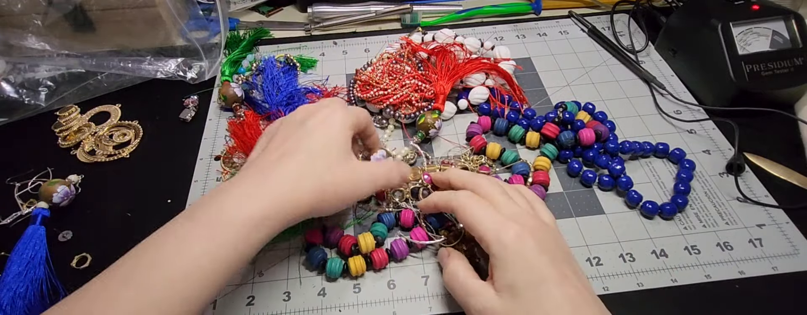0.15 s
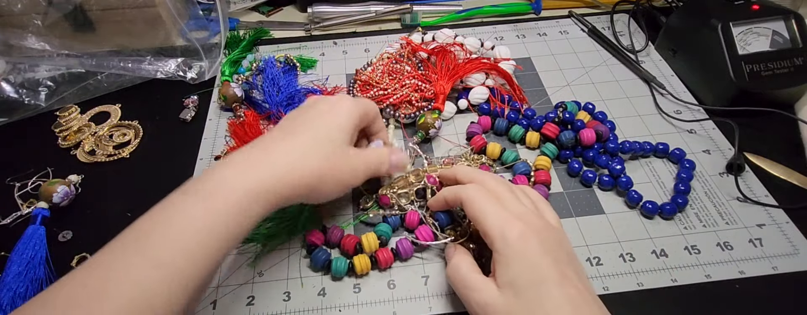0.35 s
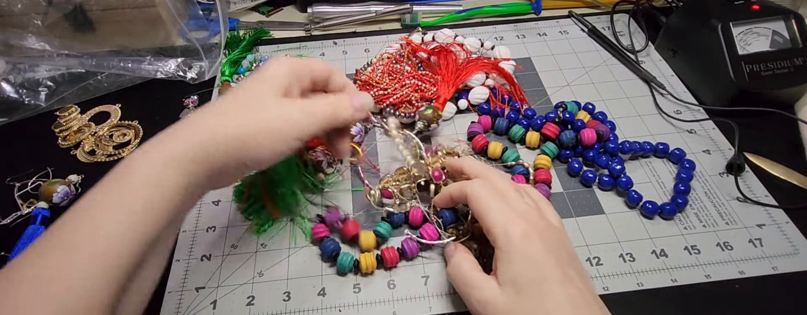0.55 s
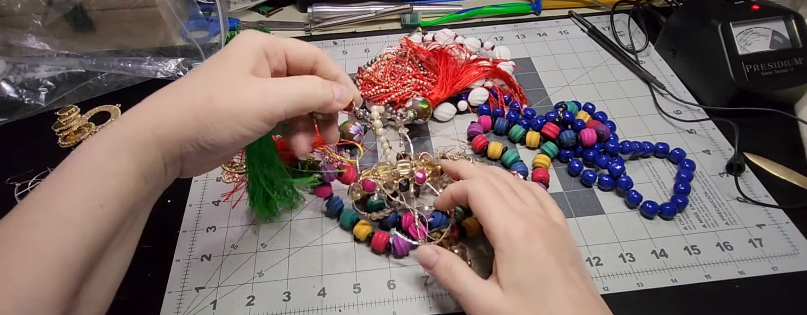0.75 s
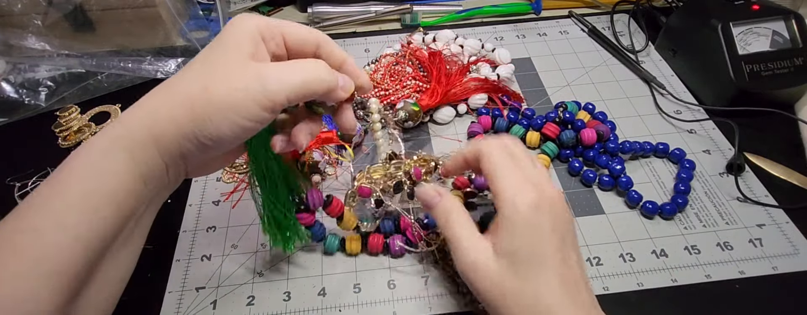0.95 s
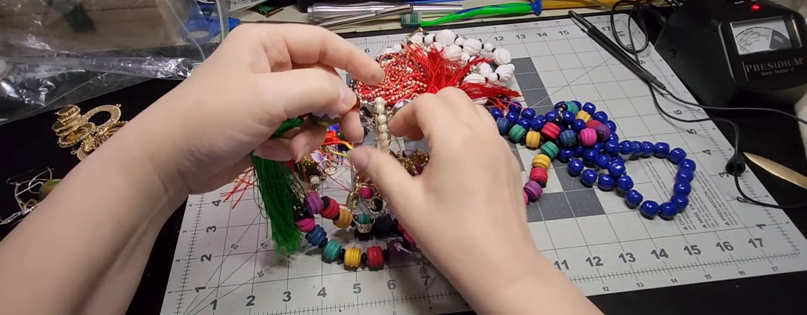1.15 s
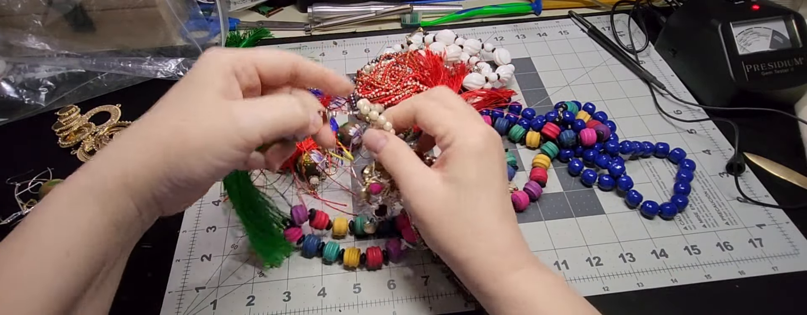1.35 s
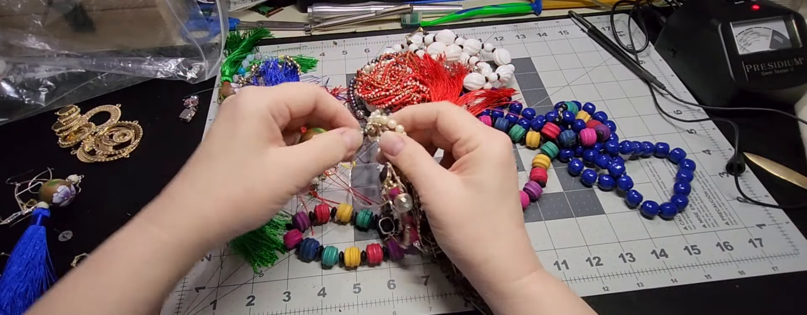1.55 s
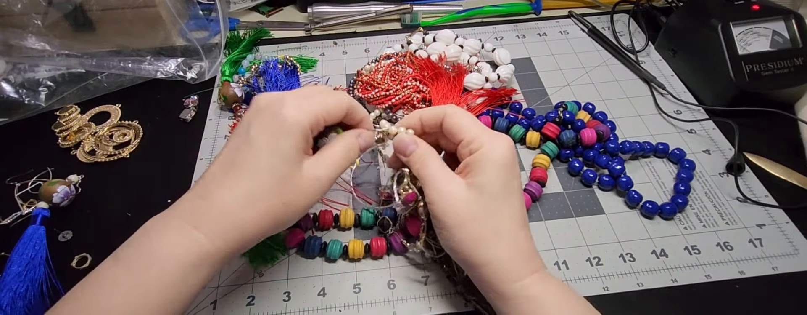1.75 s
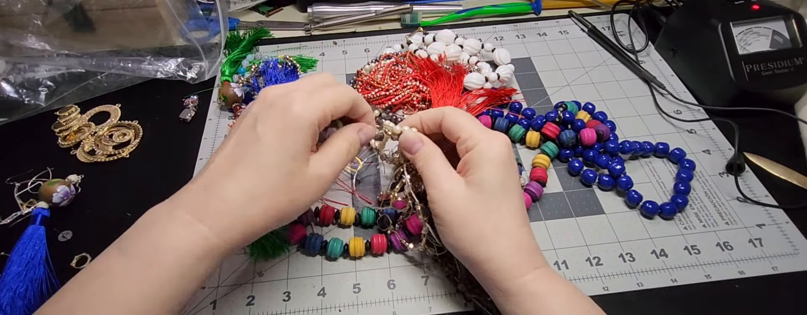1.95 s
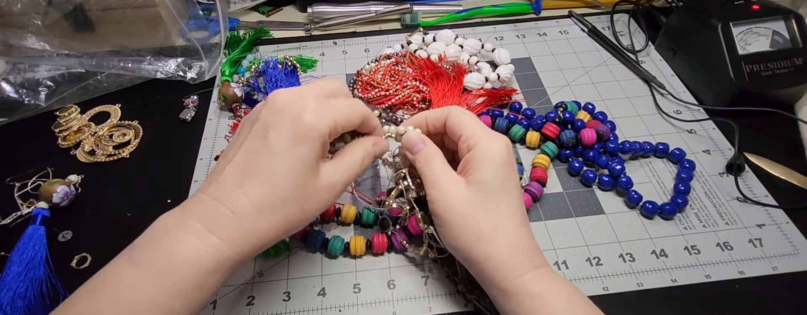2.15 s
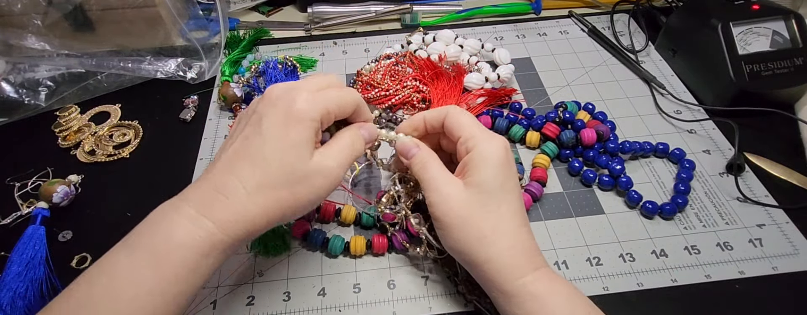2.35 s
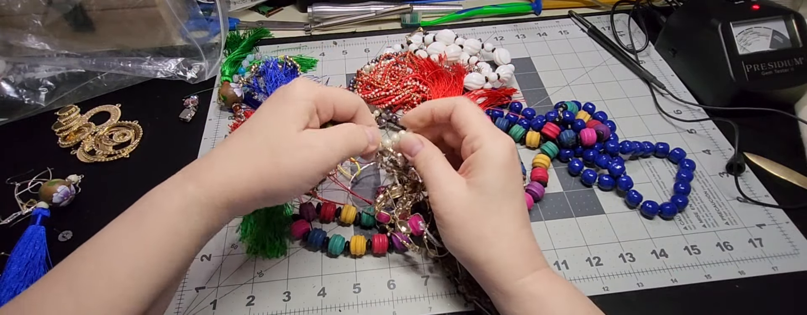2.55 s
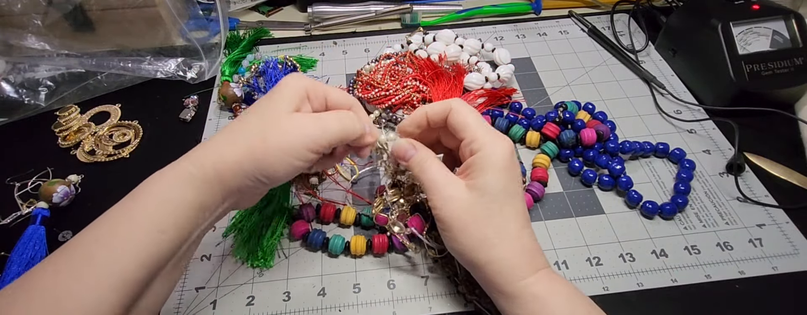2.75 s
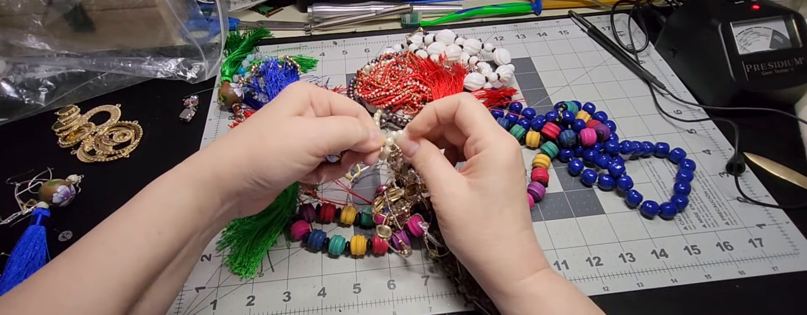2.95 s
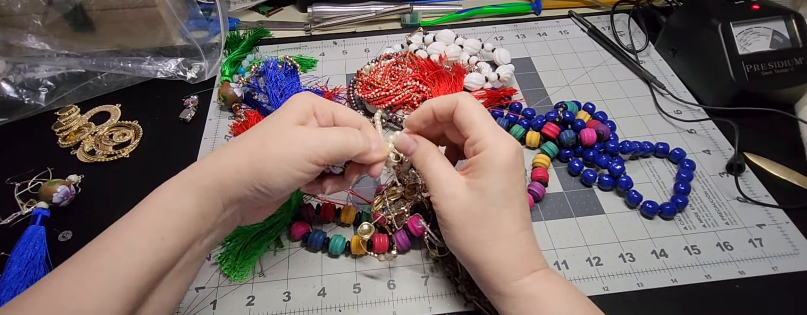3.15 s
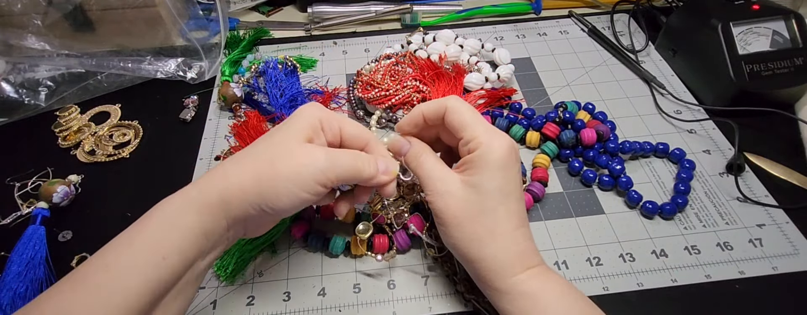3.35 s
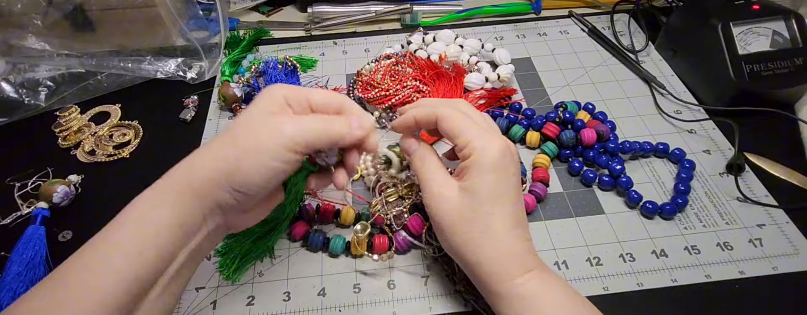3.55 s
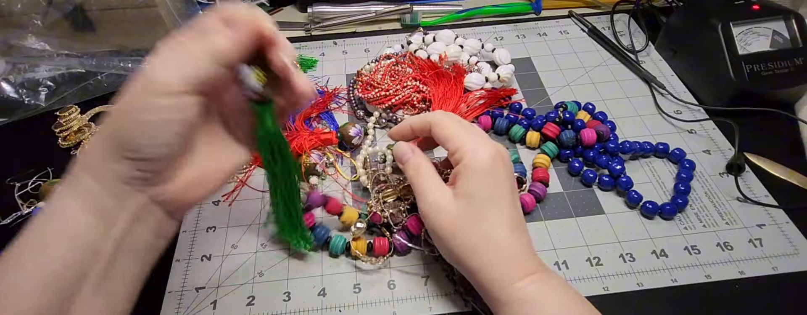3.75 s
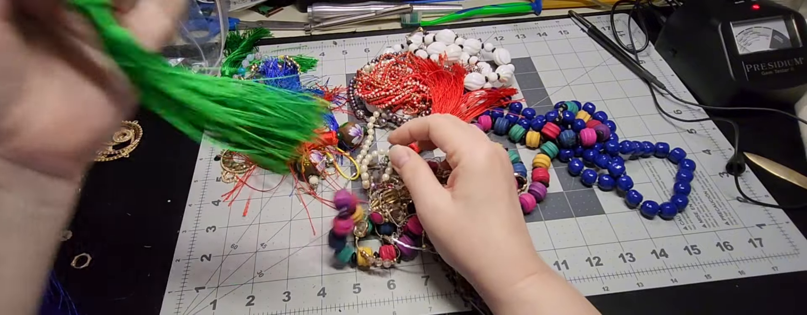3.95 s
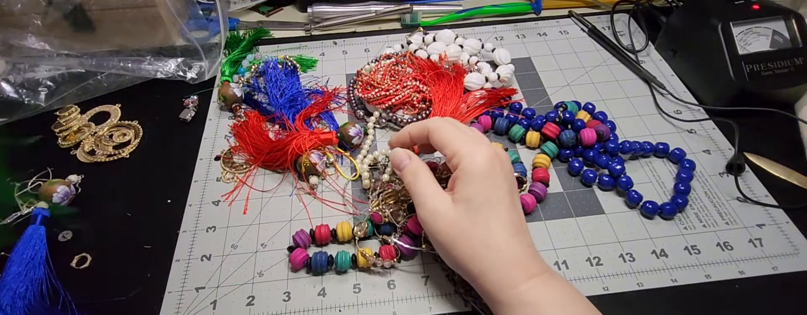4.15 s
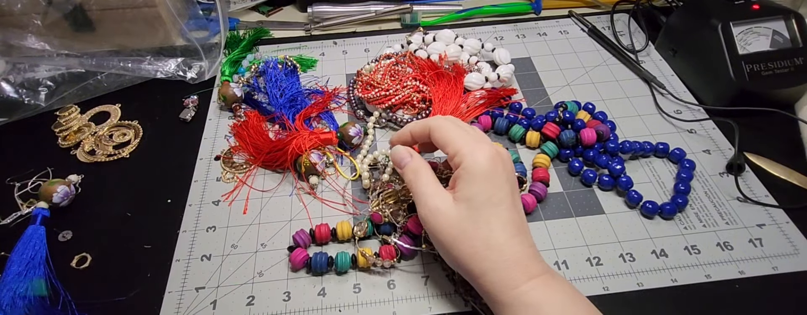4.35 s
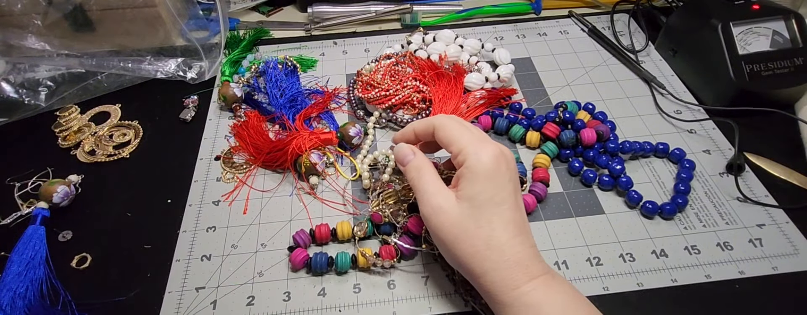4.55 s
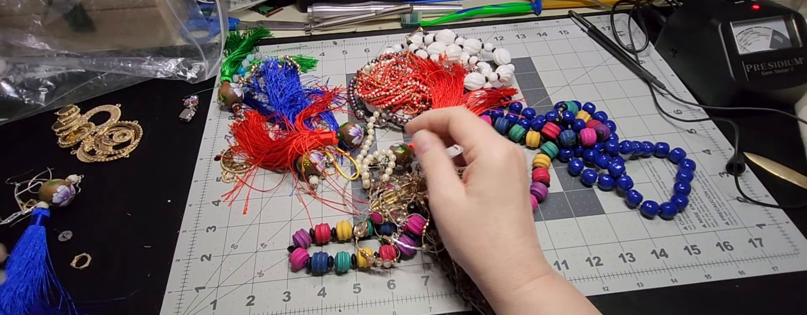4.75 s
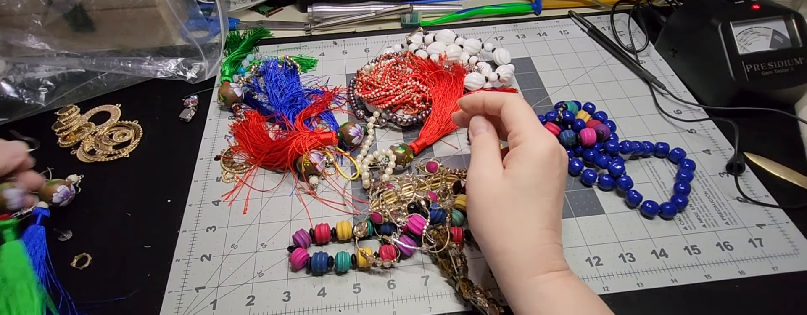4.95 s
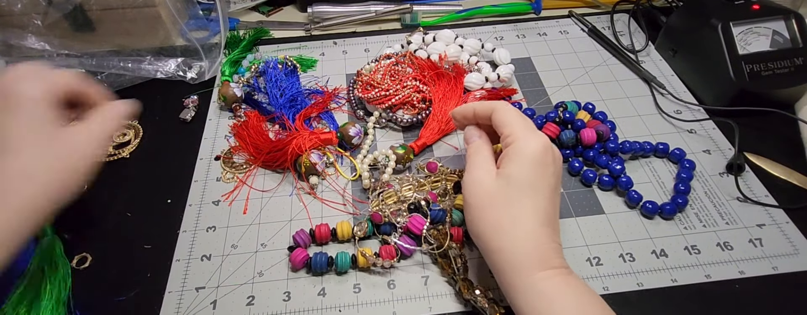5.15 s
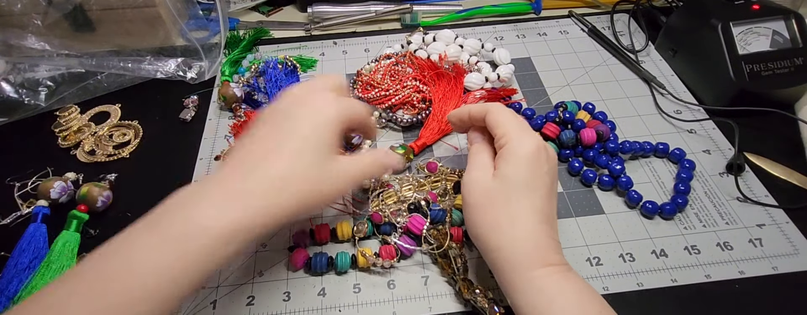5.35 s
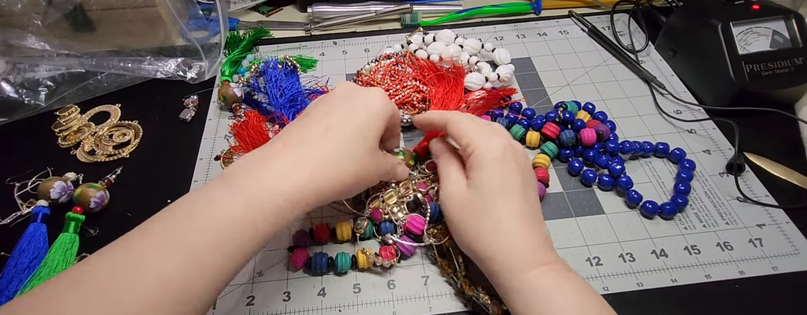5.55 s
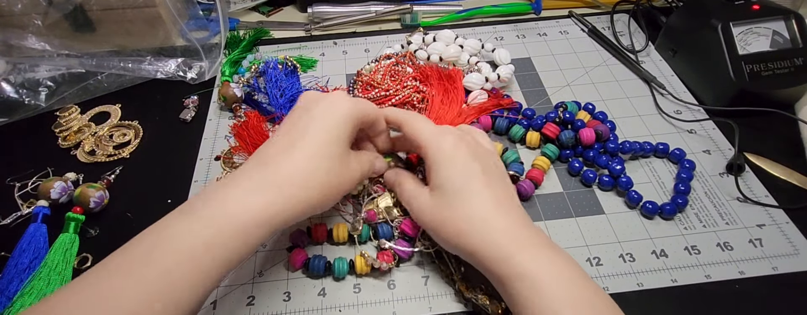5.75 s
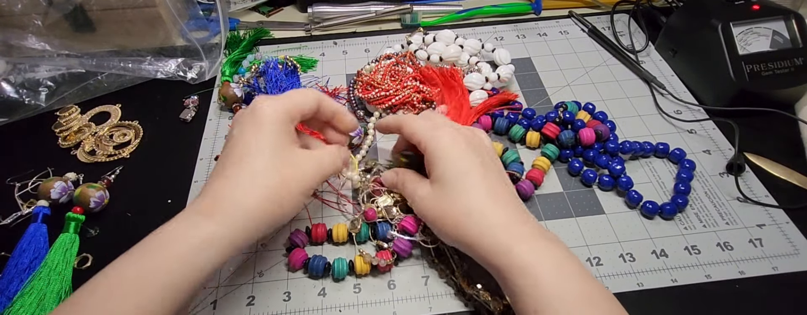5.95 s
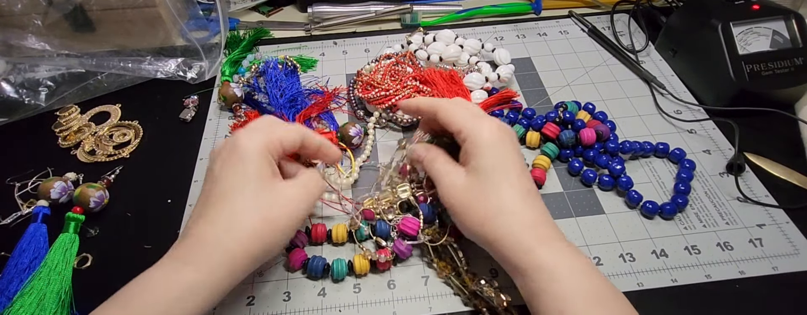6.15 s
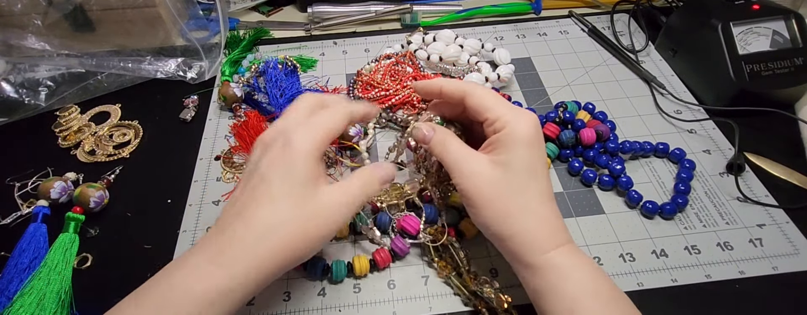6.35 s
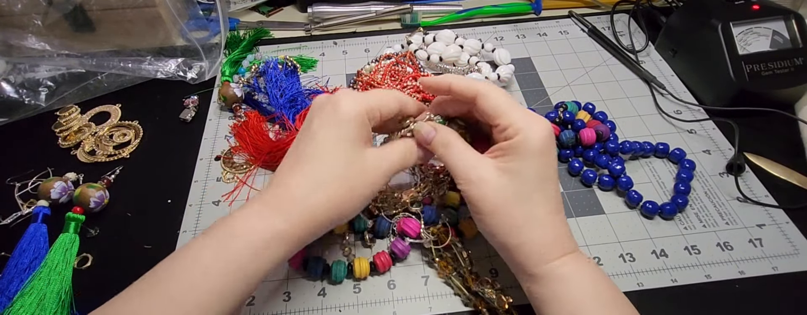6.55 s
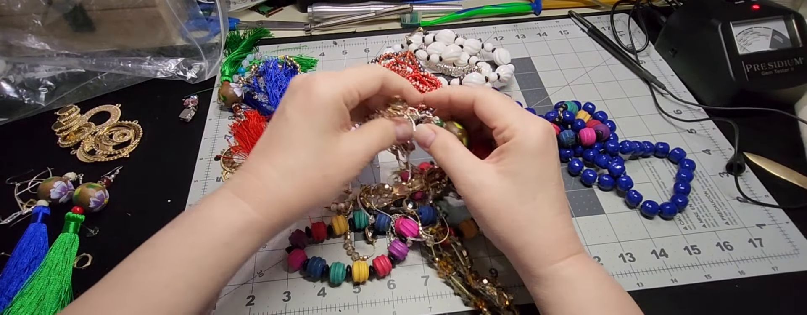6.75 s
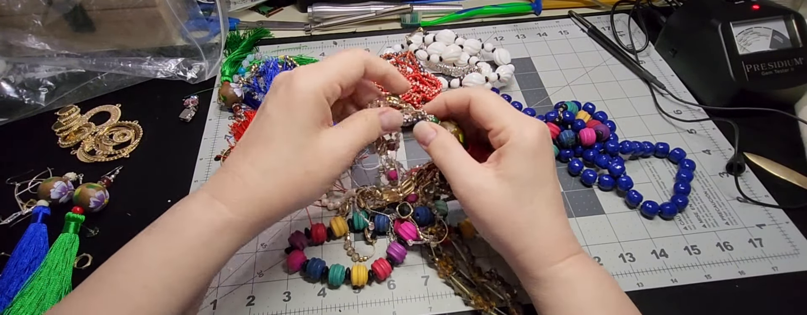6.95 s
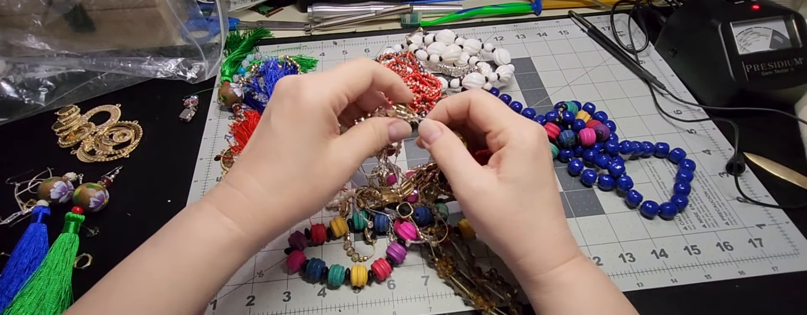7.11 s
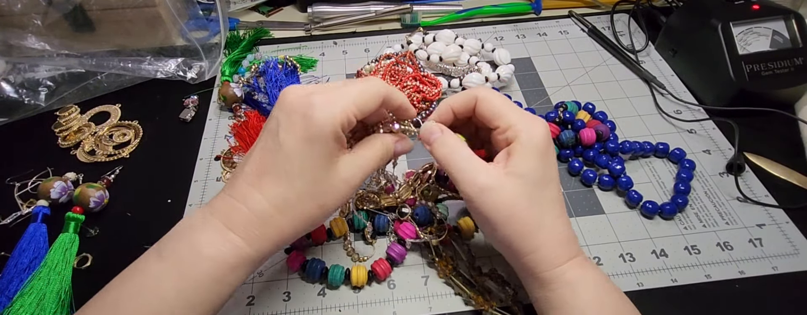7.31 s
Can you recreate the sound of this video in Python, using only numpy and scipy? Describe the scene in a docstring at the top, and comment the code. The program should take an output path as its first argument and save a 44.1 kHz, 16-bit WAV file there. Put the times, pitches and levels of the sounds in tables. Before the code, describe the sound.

Hands sort tangled bead necklaces and fine chains on a mat-covered table, heard close in stereo, mostly slightly left, in a small dry room with faint low rumble, hiss and hum. Light rustles and a soft low thump start the first half second; from 0.5 to 0.9 beads rattle densely with crisp clacks and knocks. Looser clicks follow, clustering around 1.4 to 1.5, then thinning after 2 into tiny ticks and very faint metallic tinks. About 3.45 a brief faint squeak glides upward amid a small rustle. Knocks at 3.9 lead to the loudest, sharp bead clack at 4.1. Near quiet lasts until a clack and dull thumps at 5.1 and 5.3. From 5.5 rustling bursts resume, with a bright click at 6.3 and more rattling to 6.9, then sparse soft ticks to the end near 7.5.

```python
"""A dense rustle of bead strands over rumble and hiss, then clear taps: hands rummage through necklaces
and chains on a mat-covered table, close to two microphones. Rustle and fizz are random tiny contacts;
timed blows ring decaying modes of beads, table and pendants; one sliding tone squeaks.
Noise bursts serve as echoes of table and room; filtered noise and a hum lie below."""
import sys
import numpy as np
from scipy import signal
from scipy.io import wavfile
from scipy.ndimage import uniform_filter1d, map_coordinates

SR = 44100
rng = np.random.default_rng(int(sys.argv[2]) if len(sys.argv) > 2 else 0)


def store_wav(level_fs):
    """Save 16-bit WAV to argv[1]."""
    pcm = np.round(np.clip(np.atleast_2d(level_fs), -1, 1) * 32767)
    wavfile.write(sys.argv[1], SR, pcm.T.astype(np.int16))


N = 329868

# ringing modes of a bead: mode_hz, level_db, t60_s
BEAD_MODES = [(1836, -5.5, 0.0012), (2992, -11, 0.005), (3539, -4, 0.0031), (4537, 0.5, 0.0018),
              (5860, 1.5, 0.0013), (7190, -1, 0.002), (12000, -19, 0.0012)]
# ringing modes of the table top: mode_hz, level_db, t60_s
TABLE_MODES = [(346, -10, 0.0097), (533, -12.5, 0.017), (686.4, -0.5, 0.0034), (1028.4, -5.5, 0.0063),
               (1242, -16, 0.014)]


def from_db(db):
    """Decibels to gain."""
    return 10 ** (np.asarray(db) / 20)


def rms_one(x):
    """Scale to unit rms."""
    return x / np.sqrt(np.mean(x ** 2) + 1e-20)


def in_time(rows):
    """Interpolate each column of a curve to one value a sample."""
    time_s, *columns = np.transpose(rows)
    return [np.interp(np.arange(N) / SR, time_s, column) for column in columns]


def at_hz(points, hz):
    """Read a spectrum on a log frequency axis."""
    point_hz, values = np.transpose(points)
    return np.interp(np.log(hz), np.log(point_hz), values)


def butter(x, hz, kind, order):
    """Butterworth filter, run forward."""
    return signal.sosfilt(signal.butter(order, hz, kind, fs=SR, output="sos"), x)


def drift(rate_hz):
    """Slow random signal of rms 1: noise through a double pole at rate_hz."""
    step = 40   # samples per slow value
    pole = np.exp(-2 * np.pi * rate_hz * step / SR)
    noise = rng.standard_normal(N // step + 2002)
    slow = signal.lfilter([1], [1, -2 * pole, pole * pole], noise)[2000:]   # settled part
    return np.interp(np.arange(N) / step, np.arange(len(slow)), rms_one(slow))


def ring(clicks, hz, t60_s):
    """A two-pole resonator: a unit click starts a decaying sine of initial height 1."""
    radius = 10 ** (-3 / (t60_s * SR))
    angle = 2 * np.pi * hz / SR
    return signal.lfilter([0, np.sin(angle)], [1, -2 * radius * np.cos(angle), radius ** 2], clicks + 1e-18)


def strike(at, gains, modes, spread_db, dull_db=0):
    """Blows at given samples ring modes of random strength; soft contacts lose dull_db per octave."""
    out = np.zeros(N)
    # blows within one 8-sample slot share their mode strengths
    chance = rng.standard_normal((N // 8 + 1, len(modes)))[at // 8]
    for (hz, level_db, t60_s), own in zip(modes, chance.T):
        blow_db = level_db + spread_db * own - dull_db * np.log2(hz / modes[1][0])
        clicks = np.bincount(at, gains * from_db(blow_db), N)
        rung = ring(clicks, hz, t60_s)
        # a contact takes time, so the ring starts smoothly; for positive gains pressure first drops
        out -= butter(rung, [0.3 * hz, min(1.65 * hz, 0.45 * SR)], "band", order=2)
    return butter(out, modes[0][0], "high", order=4)   # small bodies radiate no bass


def scatter(per_s, modes, size_db, crowd_db, dull_db=0):
    """Tiny contacts at random, clumped moments, a few stronger, of drifting dullness; rms 1."""
    at = np.flatnonzero(rng.random(N) < per_s * from_db(crowd_db) / SR)
    sizes = from_db(size_db * np.minimum(rng.exponential(1, N), 4)) * rng.choice([-1, 1], N)
    dullness_db = dull_db + 0.59 * drift(3.8)[at]
    return rms_one(strike(at, sizes[at], modes, spread_db=4.0, dull_db=dullness_db))


def tugs():
    """Quick tugs on a strand: cosine-squared gain swells for rustle, rumble and fizz."""
    # tugs; brightness adds chain and takes table: middle_s, length_s, rustle_db, brightness_db
    tug_rows = [(0.273, 0.1, -48, -2.5), (0.452, 0.15, -52, 3.5), (0.776, 0.07, -53, 14.5),
                (0.89, 0.096, -71, 27), (1.67, 0.066, -66.5, -19), (2.771, 0.1, -68.5, -5),
                (3.358, 0.069, -76, 29), (3.595, 0.087, -49.5, 7.5), (3.901, 0.16, -58, -5),
                (5.314, 0.047, -57.5, 6.5), (5.816, 0.085, -50.5, -1), (6.304, 0.064, -45, 12.5),
                (7.031, 0.2, -59.5, 3)]
    table_loss = 0.63   # dB of rumble lost per dB of brightness
    t, out = np.arange(N) / SR, np.zeros((3, N))
    for middle_s, length_s, level_db, bright_db in tug_rows:
        on = np.abs(t - middle_s) < length_s / 2
        swell = np.cos(np.pi * (t[on] - middle_s) / length_s) ** 2
        levels_db = [[level_db], [level_db - table_loss * bright_db], [level_db + bright_db]]
        out[:, on] += from_db(levels_db) * swell
    return out


def drag():
    """Strands slide over each other and the mat, single beads clink, fine chain links fizz on top."""
    # how busily the hands stir the pile: time_s, rustle_db
    stir_curve = [(0.0, -55), (0.49, -65), (0.53, -49), (0.7, -48.5), (0.86, -52), (1.16, -63.5),
                  (1.93, -64), (2.04, -76.5), (3.42, -79), (3.5, -61), (4.07, -66.5), (4.3, -73.5),
                  (5.46, -94), (5.49, -51.5), (5.72, -63.5), (6.2, -53), (6.42, -64.5), (6.74, -52),
                  (6.9, -54), (6.97, -83), (7.15, -82), (7.48, -69)]
    # ringing modes of chain links: mode_hz, level_db, t60_s
    chain_modes = [(7160, 4, 0.00055), (11300, -6, 0.0017), (14300, -3, 0.0007)]
    rumble_db, fizz_db, clink_db = -1.5, -5.5, -2.5   # against the bead rustle
    beads, mat, links = from_db(in_time(stir_curve)) + tugs()
    tug = drift(23)   # one jerky pull crowds all contacts together
    rustle = scatter(800, BEAD_MODES, size_db=4.0, crowd_db=4.0 * tug, dull_db=5.5)
    rumble = scatter(900, TABLE_MODES, size_db=2.5, crowd_db=3.4 * tug, dull_db=-2.0)
    fizz = scatter(4000, chain_modes, size_db=4.0, crowd_db=3 * tug + 3 * drift(31))
    clinks = scatter(130, TABLE_MODES + BEAD_MODES, size_db=2.5, crowd_db=2 * tug, dull_db=0.6)
    on_beads = beads * (rustle + from_db(clink_db) * clinks)
    return on_beads + mat * from_db(rumble_db) * rumble + links * from_db(fizz_db) * fizz


def air(level_db, patchy_db):
    """Rumble and hiss: half-octave noise bands, each with its own flicker and left-right likeness."""
    # noise density, relative: band_hz, density_db_per_hz
    air_spectrum = [(30, -11), (70, -6), (125, -9.5), (291, -13.5), (858, -31), (3000, -35), (7880, -43),
                    (9230, -48.5), (15200, -43), (16500, -74)]
    # left-right correlation of the noise: band_hz, likeness_0_to_1
    likeness_curve = [(60, 0.97), (250, 0.84), (1650, .05)]
    out, edges_hz = 0, np.append(28 * 2 ** np.arange(0, 9.5, 0.5), 18000)
    white = rng.standard_normal((2, 2, N))   # neighbouring bands use different noise
    for k, (low_hz, high_hz) in enumerate(zip(edges_hz, edges_hz[1:])):
        mid, side = butter(white[k % 2], [low_hz, high_hz], "band", order=2)
        hz = np.sqrt(low_hz * high_hz)
        alike = np.clip(at_hz(likeness_curve, hz), 0, 1)
        gain = from_db(at_hz(air_spectrum, hz) + patchy_db * drift(6.1))
        out = out + gain * (np.sqrt(1 + alike) * mid + np.sqrt(1 - alike) * side * [[1], [-1]])
    return from_db(level_db) * rms_one(out)


def hum(hz, level_db):
    """Mains hum: a sine of wavering level."""
    return from_db(level_db + 3.3 * drift(6.4)) * np.sin(2 * np.pi * hz * np.arange(N) / SR)


def taps():
    """Beads clack and knock the table, or only meet each other; each contact jolts a few neighbours."""
    # beads landing on the table: start_s, clack_db, knock_db
    tap_rows = [(0.1066, -28, -31), (0.267, -24, -27.5), (0.5308, -18, -27.5), (0.5464, -22, -30.5),
                (0.58, -20.5, -31), (0.642, -17.5, -22.5), (0.672, -15, -18), (0.7169, -15, -20.5),
                (0.7344, -15.5, -24.5), (0.757, -15.5, -25.5), (0.7659, -16, -25.5), (1.023, -26, -38),
                (1.085, -25.5, -32.5), (1.3933, -27.5, -32), (1.4096, -21, -29), (1.4536, -35, -31.5),
                (1.4648, -20, -27.5), (1.4724, -27.5, -41), (1.4756, -34, -34), (1.5052, -23.5, -30.5),
                (1.5194, -24.5, -32), (1.528, -42, -34), (1.544, -35, -36), (1.66, -29.5, -41.5),
                (1.853, -27.5, -33), (2.067, -62, -50), (2.18, -56, -44), (2.217, -45, -52),
                (2.313, -44.5, -47), (2.336, -38, -41), (2.477, -31, -38.5), (2.769, -32, -39.5),
                (3.45, -60, -37.5), (3.5751, -37, -33), (3.908, -20.5, -27.5), (3.933, -12, -15.5),
                (4.0362, -20.5, -23), (4.0915, -16, -23), (4.105, -6.5, -18.5), (4.1146, -1, -13),
                (4.1166, -5, -15), (5.083, -15.5, -31), (5.304, -27.5, -33.5), (5.476, -27.5, -33.5),
                (5.4897, -20.5, -33), (5.5997, -23, -30.5), (5.763, -33, -44), (5.8223, -22, -24.5),
                (6.1055, -25, -32), (6.2919, -23.5, -29), (6.4792, -19.5, -29), (6.5675, -30, -37),
                (6.7958, -23, -30.5), (6.86, -31, -27), (6.8724, -19.5, -29)]
    # beads meeting off the table, no knock: start_s, clack_db, dullness_db_per_octave (small beads below zero)
    tick_rows = [(0.5005, -34.5, -3), (0.608, -33.5, -10.5), (0.7095, -32, 8), (0.775, -38, 12),
                 (0.8053, -25.5, -1), (0.867, -43, -10), (0.975, -44, -7), (1.087, -16, 2.5),
                 (1.1588, -39, 10), (1.21, -55, -15), (1.4448, -22, 7.5), (1.539, -58.5, -24),
                 (1.942, -31.5, 11.5), (2.783, -37, 2), (2.857, -60, -14), (3.0645, -70.5, -24.5),
                 (3.2411, -38.5, 16), (3.352, -58, -9), (3.437, -40, 7), (3.5017, -23.5, 7.5),
                 (3.576, -49, -15), (3.846, -37.5, -9), (3.862, -30.5, -8), (3.994, -35.5, -8),
                 (4.074, -35.5, -2.5), (5.65, -29.5, 5), (5.681, -47, -15.5), (6.05, -38, -3),
                 (6.3, -12.5, 1.5), (6.31, -29, 1), (6.316, -21.5, 4), (6.514, -45.5, -18),
                 (6.745, -34.5, 0), (6.923, -26, 0.5), (7.067, -25.5, 1.5), (7.366, -48.5, -6),
                 (7.4054, -40, -0.5)]
    rebounds, rebound_s, rebound_loss_db = 3, 0.02, 13.5   # count, latest delay, least loss

    start_s, clack_db, knock_db = np.transpose(tap_rows)
    soft_db = np.clip(0.98 * (knock_db - clack_db + 14.0), 1.5, 12)   # more knock, duller clack
    tick_s, tick_db, tick_soft_db = np.transpose(tick_rows)
    start_s = np.append(start_s, tick_s)
    clack_db = np.append(clack_db, tick_db)
    soft_db = np.append(soft_db, tick_soft_db)
    knock_db = np.append(knock_db, tick_db - np.inf)

    late, weak = rng.random((2, rebounds, len(start_s)))
    loss_db = np.vstack([0 * start_s, rebound_loss_db * (1 + weak)])
    all_s = np.vstack([start_s, start_s + rebound_s * late]).ravel()
    at = np.round(all_s * SR).astype(int) - 8   # blows lead the listed times by 8 samples
    clack_gain = from_db(clack_db - loss_db).ravel()
    knock_gain = from_db(knock_db - loss_db).ravel()
    clack = strike(at, clack_gain, BEAD_MODES, spread_db=2.6, dull_db=np.tile(soft_db, rebounds + 1))
    return clack + strike(at, knock_gain, TABLE_MODES, spread_db=2.5)


def thumps():
    """Heavy things set down make the whole table boom; pressure first rises."""
    # things set down: start_s, level_db, dullness_db_per_octave
    thump_rows = [(0.101, -43, 4), (0.253, -33.5, -6), (5.081, -34, -18), (5.302, -28, -23)]
    # modes of the whole table: mode_hz, level_db, t60_s
    boom_modes = [(129.6, 6.5, 0.061), (193, -9, 0.065)]
    start_s, boom_db, dull_db = np.transpose(thump_rows)
    at = np.round(start_s * SR).astype(int)
    return strike(at, -from_db(boom_db), boom_modes, spread_db=1, dull_db=dull_db)


def tinks():
    """A small metal pendant touched alone rings its longer modes."""
    # touches: start_s, level_db
    tink_rows = [(2.348, -62), (2.906, -64), (4.628, -59), (5.197, -62)]
    # pendant modes: mode_hz, level_db, t60_s
    charm_modes = [(1240, -6, 0.05), (2160, -3, 0.065), (3950, 0, 0.065)]
    start_s, tink_db = np.transpose(tink_rows)
    return strike(np.round(start_s * SR).astype(int), from_db(tink_db), charm_modes, spread_db=2.0)


def squeak():
    """A strand pulled through squeaks faintly: a rough, wavering sine that glides up."""
    # glide: time_s, pitch_hz, level_db
    squeak_curve = [(3.43, 5340, -90), (3.45, 5370, -67), (3.57, 5570, -61), (3.59, 5620, -95)]
    pitch_hz, level_db = in_time(squeak_curve)
    gain = from_db(level_db + 3 * drift(90))
    return gain * np.sin(2 * np.pi * np.cumsum(pitch_hz + 50 * drift(120)) / SR)


def place(x):
    """Direct sound: the two microphones differ in arrival time and level."""
    # where the hands work: time_s, left_lag_samples, left_minus_right_db
    place_curve = [(0, -4, 5), (3.95, -4, 7), (4.12, 0.24, 3.5), (5.3, 11, -2), (5.46, -4, 6)]
    lag, pan_db = in_time(place_curve)
    lag = lag + 1.7 * drift(14)   # contacts lie all over the pile
    n = np.arange(N)
    return np.array([from_db(side * pan_db / 2) * map_coordinates(x, [n - side * lag / 2], order=3)
                     for side in (1, -1)])


def surroundings(x, near_db, near_t60_s, room_db, room_t60_s, wall_hz, apart, count=6):
    """Decaying noise echoes: things on the table scatter early and briefly, the room longer and fainter."""
    t, out = np.arange(SR // 2) / SR, 0
    # the hands keep moving: one of count echo patterns is drawn every 1500 samples
    spot = np.repeat(rng.integers(0, count, N // 1500 + 1), 1500)[:N]
    for k in range(count):
        shared, *own = rng.standard_normal((3, len(t)))   # near echoes are partly common to both sides
        near_decay = from_db(near_db) * 10 ** (-3 * t / near_t60_s) * (t > 0.0012)
        near = (shared + apart * np.array(own)) * near_decay
        room_decay = from_db(room_db) * 10 ** (-3 * t / room_t60_s) * (t > 0.006)
        room = rng.standard_normal((2, len(t))) * room_decay
        echo = butter(near + room, [250, wall_hz], "band", order=1)
        here = uniform_filter1d(1.0 * (spot == k), size=200) * x   # short crossfades
        out = out + signal.fftconvolve(here[None], echo, axes=1)[:, :N]
    return out


def scene():
    """Jewellery in its room over air noise and hum; the left microphone is the more sensitive."""
    jewellery = drag() + taps() + thumps() + tinks() + squeak()
    echoes = surroundings(jewellery, near_db=-25.0, near_t60_s=0.036, room_db=-37.5, room_t60_s=0.22,
                          wall_hz=9300, apart=1.0)
    background = echoes + air(level_db=-63, patchy_db=1.5) + hum(hz=60, level_db=-66.5)
    # the direct sound has its left-right levels from place()
    return place(jewellery) + background * from_db([[2.2], [-2.2]])


def record(dry):
    """The microphone drops deep bass and dips near 9.6 kHz; peaks are rounded and clipped, the top is cut."""
    overload, stop_hz = 0.84, 16700   # clip level; 75 dB down from stop_hz up
    b, a = signal.iirnotch(9600, 2.5, SR)
    dipped = 0.44 * dry + 0.68 * signal.lfilter(b, a, dry)   # partial notch
    coloured = butter(dipped, 27, "high", order=2)
    rounded = np.clip(1.444 * np.tanh(coloured / 1.527), -overload, overload)
    top_cut = signal.cheby2(16, 75, stop_hz, fs=SR, output="sos")
    return signal.sosfilt(top_cut, rounded)


dry = scene()
out = record(dry)
store_wav(out)
```